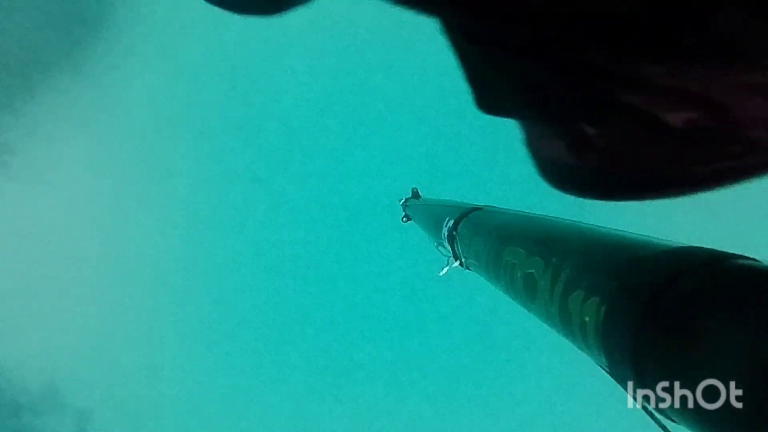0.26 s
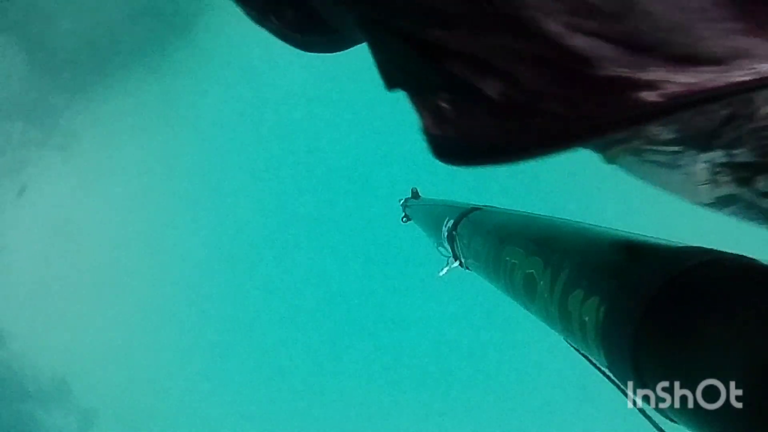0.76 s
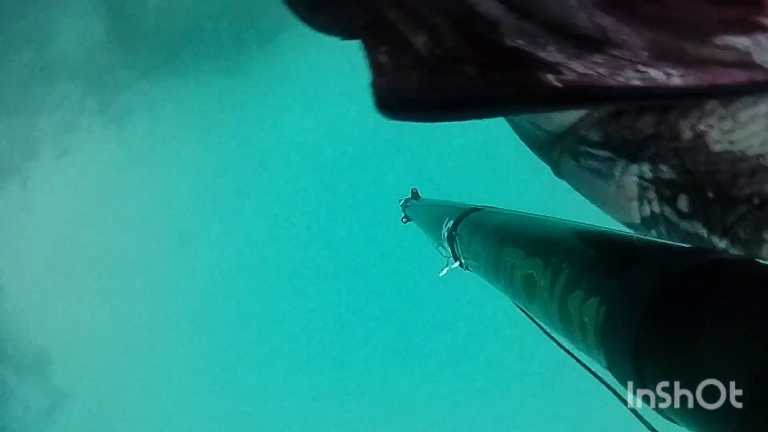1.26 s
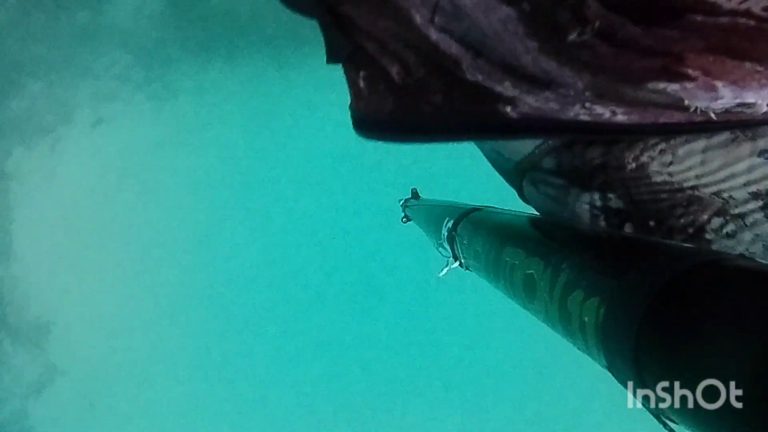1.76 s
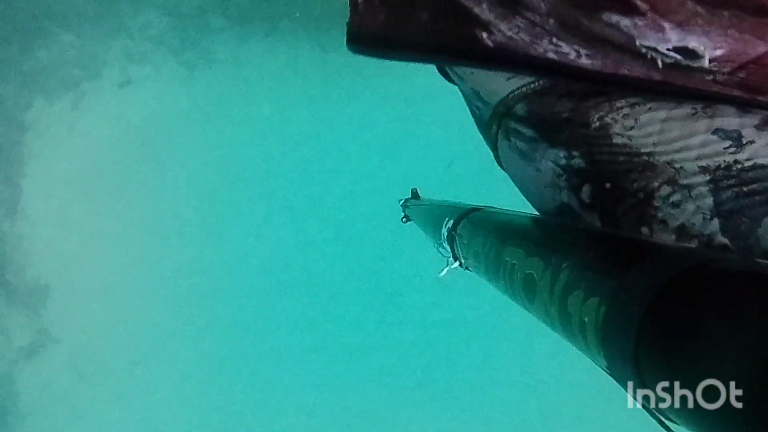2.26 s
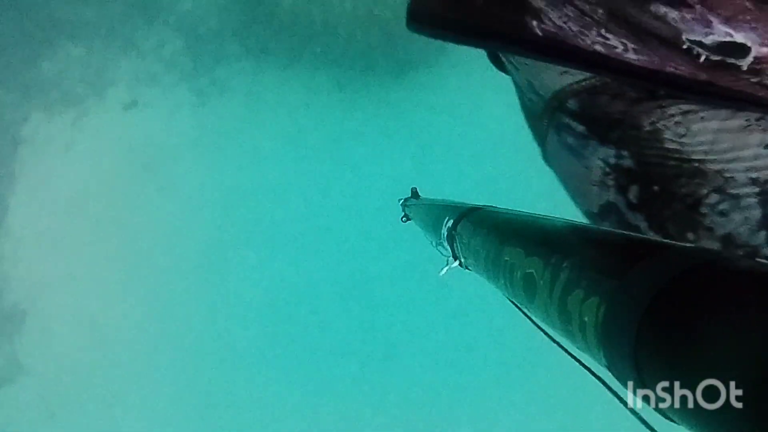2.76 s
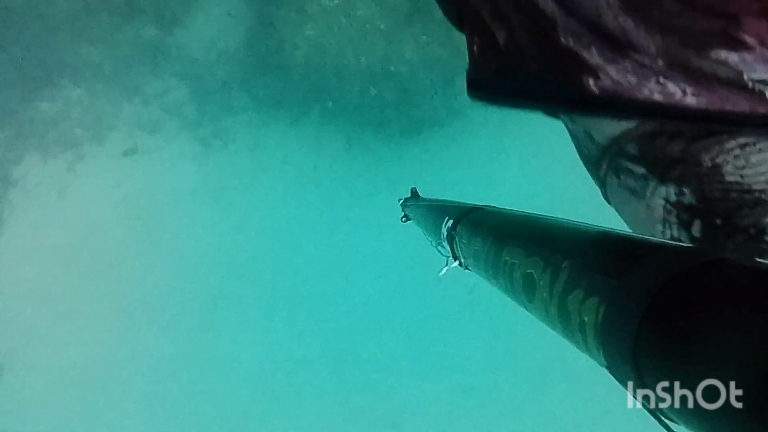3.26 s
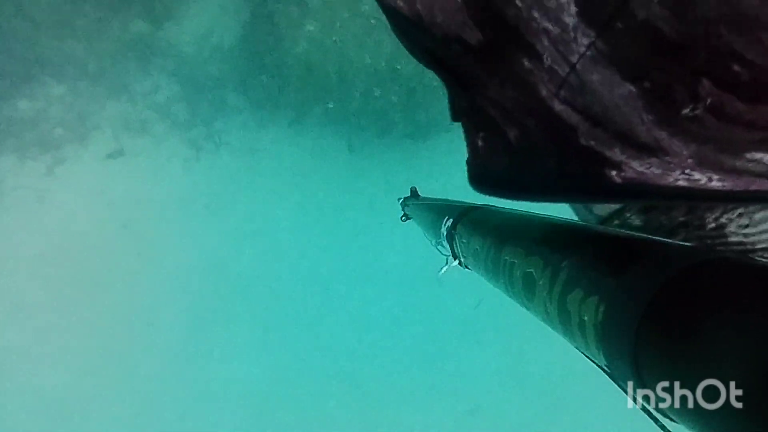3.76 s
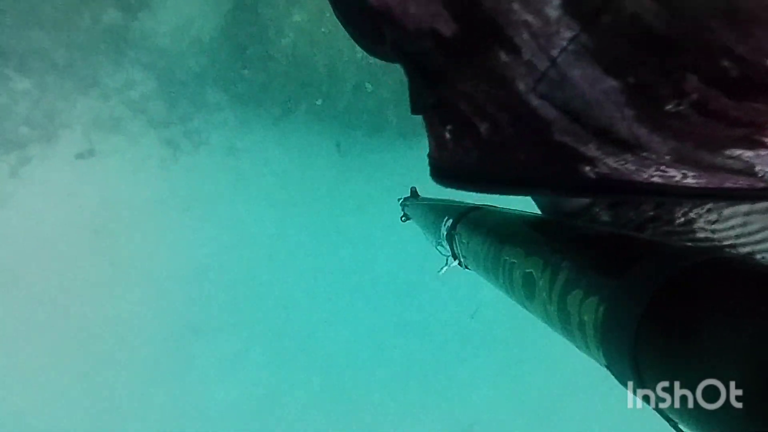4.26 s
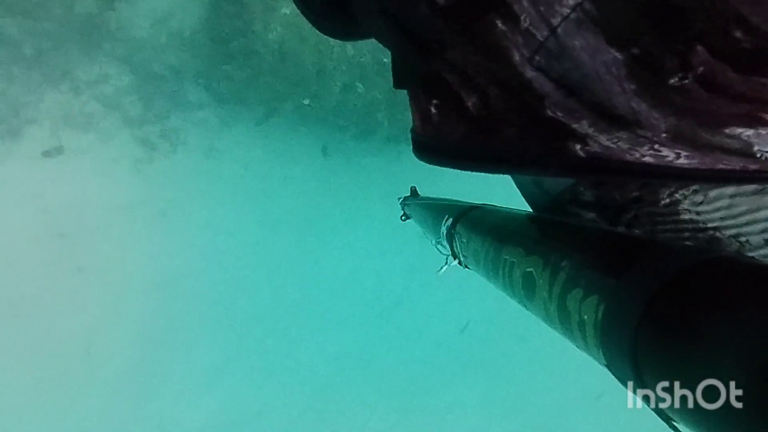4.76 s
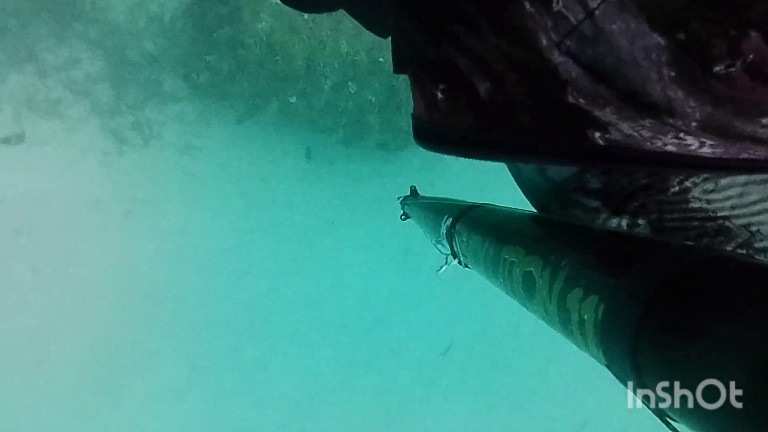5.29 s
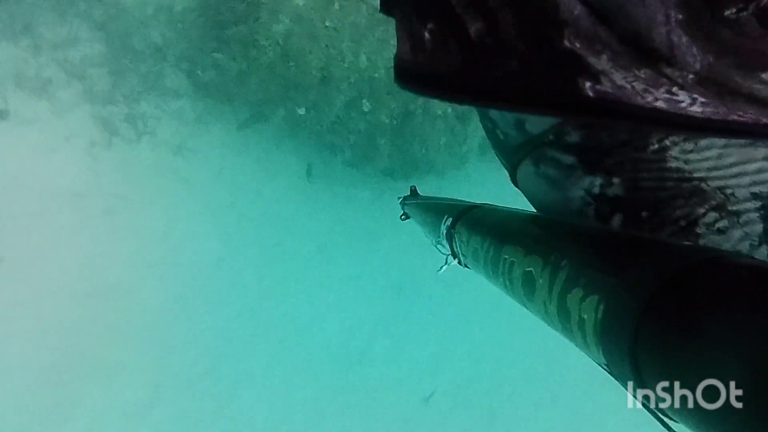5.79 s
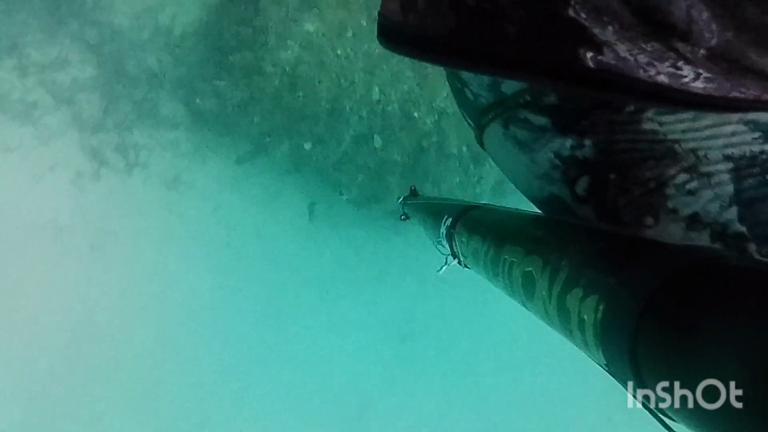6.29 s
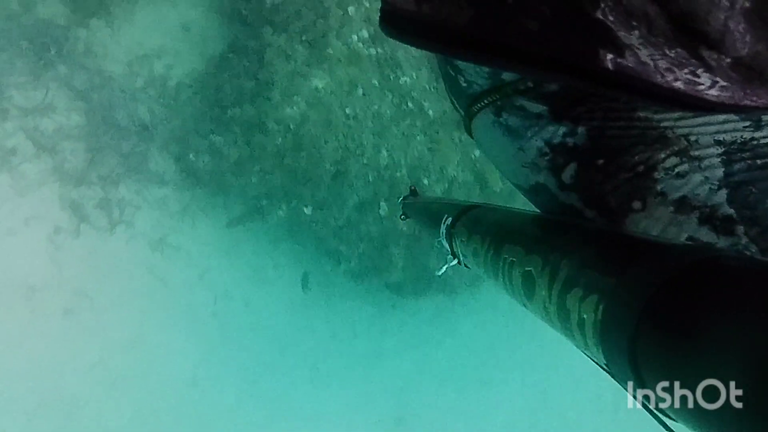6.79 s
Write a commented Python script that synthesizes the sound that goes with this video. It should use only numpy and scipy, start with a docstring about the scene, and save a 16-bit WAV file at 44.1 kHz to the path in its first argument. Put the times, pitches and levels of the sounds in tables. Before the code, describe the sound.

Underwater, a rough rub and hard double knock, then scattered dull bumps and tiny clicks over faint low rumble, ending in a loud speargun crack.

```python
"""Under water, over sand: a spearfisher glides along with a camera in a watertight housing.
Water rumbles low under a faint hiss, both filtered noise; shrimp snap and the lens drive ticks in short rings.
Gear bumps the housing in dull knocks, made of dying sines. A rub and a hard double knock open the scene.
At the end the speargun fires with a crack, a ring and a shove that overload the microphone."""
import sys
import numpy as np
from scipy import signal
from scipy.fft import rfft, irfft
from scipy.io import wavfile

SR = 44100
rng = np.random.default_rng(int(sys.argv[2]) if len(sys.argv) > 2 else 0)


def to_wav(s):
    """Save 16-bit WAV."""
    ch = np.atleast_2d(s).T  # columns
    pcm = np.round(np.clip(ch, -1, 1) * 32767)  # PCM
    wavfile.write(sys.argv[1], SR, pcm.astype(np.int16))


N = 310023
TIME = np.arange(N) / SR  # seconds from the start
AFTER = np.arange(4096) / SR  # seconds since a blow

# In every table of ringing, t60_s is the time a note takes to die by 60 dB.
# The notes the housing rings with: pitch_hz [Hz], level_db [dB], t60_s [s]
HOUSING_NOTES = [(371, -31, 0.0077), (472, -12.5, 0.076), (630, -14.5, 0.054), (847, 3, 0.0075),
                 (1270, -7, 0.015), (1590, -6.5, 0.021), (2160, -20.5, 0.024), (3250, -14.5, 0.011)]


def gain_of(db):
    """Turns decibels into a factor."""
    return 10 ** (np.asarray(db) / 20)


def evened(x):
    """Scales a sound to an rms (average strength) of one."""
    return x / np.sqrt(np.mean(x ** 2) + 1e-20)


def add(mix, start_s, sound):
    """Adds a sound into the mix at a given time, cutting off what runs past the end."""
    part = mix[max(round(start_s * SR), 0):][:len(sound)]
    part += sound[:len(part)]


def follow(curve):
    """Joins the (time, level) rows of a table by straight lines."""
    return np.interp(TIME, *np.transpose(curve))


def coloured(x, points):
    """Filters a sound to a given spectrum, with no sound ahead of its cause (minimum phase)."""
    hz, db = np.transpose(points)
    grid_hz = abs(np.fft.fftfreq(8192, 1 / SR)) + 1  # the 1 avoids log(0)
    log_gain = np.log(gain_of(np.interp(np.log(grid_hz), np.log(hz), db)))
    response = np.exp(np.conj(signal.hilbert(log_gain)))
    taps = np.fft.ifft(response).real[:len(AFTER)]
    return signal.fftconvolve(x, taps)[:len(x)]


def cut(x, hz, kind, order=2):
    """Keeps what lies below ("low") or above ("high") a frequency."""
    sos = signal.butter(order, min(hz, SR / 2 - 1), kind, fs=SR, output="sos")
    return signal.sosfilt(sos, x)


def ring(notes):
    """Sums the dying sines that one blow sets off."""
    return sum(gain_of(db - 60 * AFTER / t60) * np.sin(2 * np.pi * hz * AFTER) for hz, db, t60 in notes)


def gripped(x):
    """The diver's hand chokes any ringing within a few hundredths of a second."""
    return x * np.exp(-(AFTER / .02) ** 2)


def drift(rate_hz):
    """Makes a slow random wander of rms one from noise below a frequency."""
    spectrum = rfft(rng.standard_normal(N))
    return evened(irfft(spectrum * (np.fft.rfftfreq(N, 1 / SR) < rate_hz), N))


def burst(colour, t60):
    """A short spray of tiny contacts is dying noise, coloured and brought back to its old energy."""
    spray = evened(rng.standard_normal(len(AFTER))) * gain_of(-60 * AFTER / t60)
    sound = coloured(spray, colour)
    energy = np.sum(gain_of(-120 * AFTER / t60))
    return sound * np.sqrt(energy / np.sum(sound ** 2))


def water(flow_db=2, lump_db=1.5, hiss_db=-69.5, waver_db=1.0):
    """Moving water rumbles in slow random lumps, under a faint hiss that wavers slightly."""
    # Strength of the water round the housing, before flow_db: time_s [s], level_db [dB]
    flow = [(0.75, -58), (1.66, -57.5), (2.49, -59), (4.38, -60), (5.41, -63.5), (6.22, -59.5), (6.48, -60),
            (6.7, -58.5)]
    # Colour of the rumble: pitch_hz [Hz], level_db [dB]
    flow_colour = [(10, -12), (20, -1), (60, -4), (90, -14), (180, -11), (280, -27), (480, -26.5),
                   (680, -31.5), (1000, -44.5), (2000, -70)]
    # Colour of the hiss inside the housing: pitch_hz [Hz], level_db [dB]
    hiss_colour = [(700, -25), (1000, -15), (1420, 1.5), (1700, 0), (2200, -11.5), (2750, -7.5),
                   (3300, -17), (4400, -17.5), (5100, -10), (5800, -15), (6700, -12), (9400, -21.5),
                   (10400, -16.5), (11800, -26.5), (15400, -25), (16000, -39.5)]
    lumpy = rng.standard_normal(N) * gain_of(lump_db * drift(12))
    rumble = evened(coloured(lumpy, flow_colour))
    hiss = evened(coloured(rng.standard_normal(N), hiss_colour)) * gain_of(waver_db * drift(20))
    return gain_of(follow(flow) + flow_db) * rumble + gain_of(hiss_db) * hiss


def shrimp(wall_db=-4, fizz_db=-9, t60=0.0066, reef_db=-55.0, reef_spread_db=1.5, count=16, far_per_s=8):
    """Snaps ring at their own pitch and in the housing wall; more come as the reef draws close."""
    # The nearest shrimp: start_s [s], peak_db [dB], pitch_hz [Hz]
    near = [(1.871, -47.5, 5150), (1.9183, -52.5, 5300), (2.6643, -51.5, 9000), (3.2825, -45, 4900),
            (4.513, -42, 8790), (5.882, -52.5, 9560), (6.323, -46, 5160), (6.3559, -38.5, 4130),
            (6.4358, -47.5, 8600)]
    out = np.zeros(N)
    # the square root crowds the random times towards the end
    reef = [(TIME[-1] * np.sqrt(when), reef_db + reef_spread_db * (2 * size - 1), 5000 + 600 * pitch)
            for when, size, pitch in rng.random((count, 3))]
    wall = gain_of(wall_db) * ring([(5160, 6.0, 0.0069), (10200, -6.0, 0.0055), (14000, -7, .01)])
    for start_s, peak_db, pitch_hz in list(near) + reef:
        fizz = gain_of(fizz_db) * burst([(1200, -19.0), (3000, 14), (15000, -11)], t60)
        snap = ring([(pitch_hz, 0, t60)]) + wall + fizz
        add(out, start_s, gain_of(peak_db) * snap / abs(snap).max())
    # faint far snaps at random times all share one short ring
    far = (rng.random(N) < far_per_s / SR) * gain_of(rng.uniform(-66, -56, N))
    far_snap = ring([(3630, -2, 0.0062), (5200, -4, 0.011), (6600, -8, 0.0066)])
    return out + signal.fftconvolve(far, far_snap / abs(far_snap).max())[:N]


def lens_steps(count=3, first_db=-4):
    """The drive steps evenly through each run: the first step is weaker, one in three may be stronger."""
    # Runs of the lens drive: start_s [s], length_s [s], step_s between steps [s],
    # level_db [dB], accent_db of the stronger steps [dB]
    runs = [(0.538, .082, 0.024, -57, 7.5), (1.017, .135, .03, -56.5, 0), (1.686, .048, .019, -54, 6),
            (1.757, .09, .02, -52, 1.5), (2.165, .115, .026, -60, 5.5), (6.092, .14, .025, -55.5, 9),
            (6.256, .26, .025, -54, 4), (6.553, .125, .038, -59, 2), (6.724, .078, .031, -55, 6),
            (6.872, .07, .02, -44.5, 2)]
    steps = []
    for start_s, length_s, step_s, level_db, accent_db in runs:
        for k in range(int(length_s / step_s) + 1):
            tick_db = level_db + accent_db * (k % count == 1) + first_db * (k == 0)
            steps.append((start_s + k * step_s, tick_db))
    return steps


def lens(buzz_db=0.5, spread=0.013, scrape_db=-17, scrape_t60=0.042):
    """Each step of the drive starts with a faint scrape and swells into a brief buzz."""
    # Notes of the buzz, before a small random detuning: pitch_hz [Hz], level_db [dB], swell_s to the peak [s]
    notes = [(1618, -4, 0.0028), (1727, -8.5, 0.0015), (4430, -12.5, .0016), (2130, -13.5, 0.00085),
             (5540, -34.5, 0.00089)]
    scrape_colour = [(800, -3), (1700, 3), (3200, -6), (4700, 5), (7000, -19), (12000, -25)]
    out = np.zeros(N)
    for start_s, tick_db in lens_steps():
        add(out, start_s, gain_of(tick_db + scrape_db) * burst(scrape_colour, scrape_t60))
        for pitch_hz, note_db, swell_s in notes:
            u = AFTER / swell_s
            swell = u ** 2 * np.exp(2 - 2 * u)  # peaks at one
            detune = 1 + spread * rng.standard_normal()
            tone = np.sin(2 * np.pi * (pitch_hz * detune * AFTER + rng.random()))
            add(out, start_s, gain_of(buzz_db + tick_db + note_db) * swell * tone)
    return out


def scuff(level_db=-73, start_s=1.25, end_s=2.85, per_s=130, hard_hz=450, low_hz=300):
    """A loose strap drags over the housing in tiny slips, swelling and fading with the swim stroke."""
    stroke = np.sin(np.pi * np.clip((TIME - start_s) / (end_s - start_s), 0, 1))
    slips = (rng.random(N) < per_s / SR) * rng.uniform(-1.04, 1, N) * stroke
    ringing = signal.fftconvolve(slips, ring(HOUSING_NOTES))[:N]
    return gain_of(level_db) * evened(cut(cut(ringing, hard_hz, "low"), low_hz, "high"))


def jostle(level_db=-50, swim_per_s=11, glide_per_s=1.6, start_s=1.2, swim_end_s=2.8, glide_end_s=5.8,
           hard_hz=900, low_hz=330):
    """Loose gear brushes the housing in faint random bumps: often in the swim, seldom in the glide."""
    per_s = np.where(TIME < swim_end_s, swim_per_s, glide_per_s) * (TIME > start_s) * (TIME < glide_end_s)
    bumps = (rng.random(N) < per_s / SR) * rng.uniform(0.28, 1, N)
    ringing = signal.fftconvolve(bumps, ring(HOUSING_NOTES))[:N]
    return gain_of(level_db) * cut(cut(ringing, hard_hz, "low"), low_hz, "high")


def thud(start_s=6.533, swell_s=.01):
    """One soft, deep bump as the diver takes aim: low dying sines under a short swell and fade."""
    out = np.zeros(N)
    u = AFTER / swell_s
    body = ring([(80, -48, .4), (135, -43, .4), (175, -49, .3), (265, -56, .15), (400, -62, .1)])
    add(out, start_s, u * np.exp(1 - u) * body)
    return out


def rub(offset_db=-1, end_s=0.32, fade_s=0.025, slips_per_s=1500, spread_db=1.5):
    """A sleeve slips along the housing in dense, uneven spurts that fade out around the hard knock."""
    # Strength of the rub, before offset_db and the fade: time_s [s], level_db [dB]
    strength = [(0.0, -43), (0.172, -47), (0.182, -43), (0.208, -54), (0.226, -50), (0.242, -64.5),
                (0.27, -52)]
    # Colour of the rub: pitch_hz [Hz], level_db [dB]
    colour = [(47, -33.5), (80, -3), (300, -11.5), (370, -4.5), (419, -11.5), (665, 0.5), (1080, -15),
              (1600, -5), (1940, -5.5), (2650, -23), (2880, -34), (3630, -35.5), (4480, -18), (6810, -48),
              (12000, -49), (15600, -81), (22000, -120)]
    slips = (rng.random(N) < slips_per_s / SR) * rng.choice([-1, 1], N)
    sizes = gain_of(spread_db * np.minimum(rng.exponential(1, N), 4))
    spurts = gain_of(2.2 * drift(70))
    sound = evened(coloured(slips * sizes * spurts, colour))
    return sound * gain_of(follow(strength) + offset_db) * np.clip((end_s - TIME) / fade_s, 0, 1)


def catches(start_db=-42.0, per_s=200, fade_db_per_s=-45, end_s=.21):
    """The sleeve also catches and lets go in coarser, fading grains that ring the housing wall."""
    # Notes of the wall: pitch_hz [Hz], level_db [dB], t60_s [s]
    wall = [(623, -15.5, .04), (918, 0.5, 0.034), (1670, -6, .02), (2000, -0.5, 0.022), (2270, -13, .014),
            (4630, -10, 0.0058)]
    slips = (rng.random(N) < per_s / SR) * rng.uniform(-0.85, 1, N) * (TIME < end_s)
    return signal.fftconvolve(slips * gain_of(start_db + fade_db_per_s * TIME), ring(wall))[:N]


def mount(swing_hz=23.0, first_db=-31, first_t60=0.4558, late_db=-43, late_t60=5.33):
    """The hard knock makes the camera mount boom; then it swings slowly and settles."""
    # Notes of the boom, before the hand chokes them: pitch_hz [Hz], level_db [dB], t60_s [s]
    boom = [(84, -22, .08), (205, -25, 0.067), (410, -13, .03)]
    t = np.maximum(TIME - .326, 0)  # seconds since the swing began
    fading = gain_of(first_db - 60 * t / first_t60) + gain_of(late_db - 60 * t / late_t60)
    out = -np.sin(2 * np.pi * swing_hz * t) * fading
    add(out, .3045, gripped(ring(boom)))
    return out


def cracks(clack_s=.3016):
    """The hardest contacts also crack brightly as dying noise, and the hardest of all clacks."""
    # Hard contacts: start_s [s], level_db [dB], t60_s [s]
    contacts = [(.3023, -20, 0.006), (0.3209, -47, .005)]
    # Colour of the crack: pitch_hz [Hz], level_db [dB]
    colour = [(900, -12), (1850, 4), (2300, -7), (2900, -24), (3700, -13), (4400, -3), (5050, -4),
              (5700, -20), (6200, -17), (7200, -30), (8000, -26), (11000, -35), (16000, -41)]
    # Notes of the clack, before the hand chokes them: pitch_hz [Hz], level_db [dB], t60_s [s]
    clack = [(828, -19, .044), (1720, -3, .0134), (1936.5, -14, .024), (2370, -29, .02), (4330, -14, .007)]
    out = np.zeros(N)
    for start_s, level_db, t60 in contacts:
        add(out, start_s, gain_of(level_db) * burst(colour, t60))
    add(out, clack_s, gripped(ring(clack)))
    return out


def knocks(low_hz=190, top_hz=3650, spread_s=.0018, rattle_db=-22, rattle_t60=0.1,
           ring_t60=.045, overtone_ratio=2.15, overtone_t60=0.021, rebound_share=.65):
    """Each bump rings the housing and the gear itself, and touches again as it rebounds."""
    # Gear bumping the housing: start_s [s], level_db [dB], hard_hz where a soft contact loses treble [Hz],
    # ring_hz of the gear [Hz], ring_db [dB], overtone_db [dB], rebound_s until the second touch [s]
    bumps = [(0.1803, -37, 3970, 595, 0, -9, 0.006), (0.221, -30, 530, 764, -5, 6, 0.0014),
             (0.2497, -37.5, 750, 575, 4, 1, 0.0025), (0.2674, -40.5, 5000, 600, -1, -8, 0.0015),
             (0.2785, -9.5, 1640, 593, -5, -2, 0.0035), (0.2998, -1.5, 960, 652, -2.5, -8.5, 0.0022),
             (0.3205, -29.5, 600.0, 610, -7, 10.0, 0.0034), (0.3508, -41, 1530, 699, -8.5, 0, 0.0015),
             (0.4274, -43, 2150.0, 747.0, 2.0, -3.0, 0.00463),
             (0.6822, -25.5, 2140, 679, -4.5, 6.5, 0.0032),
             (0.9069, -43.5, 2830.0, 533.0, -18.0, 7.5, 0.0049),
             (1.4043, -31.7, 500.0, 673.0, 7.0, -5.0, 0.002),
             (1.5652, -40, 740.0, 656, -8.0, -18.0, 0.0015), (1.7151, -50, 2500, 600, 4, 0, 0.0026),
             (1.7292, -43, 1600, 560, -18, -15, 0.0014), (1.7488, -33.5, 1320.0, 660, -16.0, -2.5, 0.0017),
             (1.8447, -46.2, 2040.0, 400.0, -18.0, -2.0, 0.0024),
             (1.9891, -41.5, 2730.0, 638.0, 7.5, -2, 0.0056),
             (2.0916, -31, 1670.0, 702, -18.0, -7.0, 0.0015), (2.1783, -45, 600, 630, -2, 5, 0.0046),
             (2.1989, -33.1, 2277, 641.0, -16.0, -10.0, 0.0015),
             (2.3703, -45, 1350.0, 616.0, -1.0, -4.0, 0.0048),
             (2.7095, -39.5, 980.0, 471.0, -14.5, -7.0, 0.00153), (2.747, -55, 1000, 442, 7, -18, 0.0045),
             (2.825, -40.3, 570.0, 535.0, -11.0, -18.0, 0.0015),
             (3.017, -25.5, 1090.0, 566, -3.0, -5.0, 0.0013), (3.0923, -58, 1470, 601, 5.5, -10, 0.0015),
             (3.1714, -42, 830.0, 559.0, -8.0, 6.0, 0.0046),
             (3.5764, -37.8, 2050.0, 629.0, -4.0, -17.5, 0.0015),
             (3.7828, -47.4, 3210.0, 615, 11.0, 1, 0.005),
             (4.7002, -50.0, 1240.0, 611.0, 11.0, -6.0, 0.0049),
             (4.8003, -52.6, 1180.0, 623.0, 11.0, 0.0, 0.0047), (5.028, -52, 760, 500, -17, -5, 0.0024),
             (5.231, -48.5, 3770.0, 613, 11.0, 1.0, 0.0054),
             (5.2883, -49.5, 1850.0, 505.0, -11.5, -18.0, 0.0023), (5.4088, -58, 1380, 494, 0, 0, 0.0014)]
    rattle_colour = [(150, -6), (480, 0), (1500, -11), (2600, -19), (3500, -19)]
    out = np.zeros(N)
    hz = np.fft.rfftfreq(len(AFTER), 1 / SR)
    shell = ring(HOUSING_NOTES)
    # bending waves: treble arrives first, 1 kHz after spread_s
    travel = np.exp(-4j * np.pi * spread_s * np.sqrt(1000 * hz))
    for start_s, level_db, hard_hz, ring_hz, ring_db, overtone_db, rebound_s in bumps:
        rebound = 1 + rebound_share * np.exp(-2j * np.pi * hz * rebound_s)
        contact = rebound / (1 + 1j * hz / hard_hz) ** 2
        gear = ring([(ring_hz, ring_db, ring_t60), (overtone_ratio * ring_hz, overtone_db, overtone_t60)])
        rattle = gain_of(rattle_db) * burst(rattle_colour, rattle_t60)  # the mount rattles on
        blow = gripped(shell + gear) + rattle
        add(out, start_s, gain_of(level_db) * irfft(rfft(blow) * contact * travel))
    return cut(cut(out, low_hz, "high"), top_hz, "low", order=4)


def shot(start_s=6.9677, ring_db=-7, crack_db=-19, crack_t60=0.0088, slide_db=-46, slide_t60=0.1,
         push_db=0.8, push_s=0.0033, rise_hz=700):
    """The trigger lets go: a crack, the ringing gun, the sliding spear, and the recoil's shove and swing."""
    # Notes of the speargun, before ring_db and the choking hand: pitch_hz [Hz], level_db [dB], t60_s [s]
    gun = [(315, -23.5, 0.006), (650, 1, 0.027), (754, -7, 0.032), (1340, -13.5, 0.03), (1613, -13, 0.027),
           (2080, -15, 0.019), (2790, -11, 0.0097), (4850, -15, 0.019), (5150, -16.5, .01),
           (5860, -13, 0.01), (6700, -30, 0.012)]
    steel = [(800, -5), (2500, -0.5), (6000, 3), (7800, -14.5), (11500, -1), (15300, -9)]
    out = np.zeros(N)
    u = AFTER / push_s
    push = gain_of(push_db) * cut((1 - u) * np.exp(-u), rise_hz, "low")  # a shove one way, then back
    swing = ring([(30, -16, 0.16), (219, -22.5, 0.055), (382, -37.5, 0.08)])
    crack = gain_of(crack_db) * burst(steel, crack_t60)
    slide = gain_of(slide_db) * burst(steel, slide_t60)
    ringing = gain_of(ring_db) * gripped(ring(gun))
    add(out, start_s, crack + slide - ringing - push + swing)
    return out


def scene():
    """Everything reaches one microphone inside the housing."""
    background = water() + shrimp() + lens()
    handling = scuff() + jostle() + thud() + rub() + catches()
    blows = mount() + cracks() + knocks() + shot()
    return (background + handling + blows)[None]


def record(dry, edge_hz=16400):
    """The microphone clips whatever is too loud; then a low-pass takes off the highest treble."""
    clipped = np.clip(dry, -1, 1)
    taps = signal.firwin(511, edge_hz, window=("kaiser", 9), fs=SR)
    return signal.oaconvolve(clipped, taps[None], "same")


dry = scene()
out = record(dry)
to_wav(out)
```